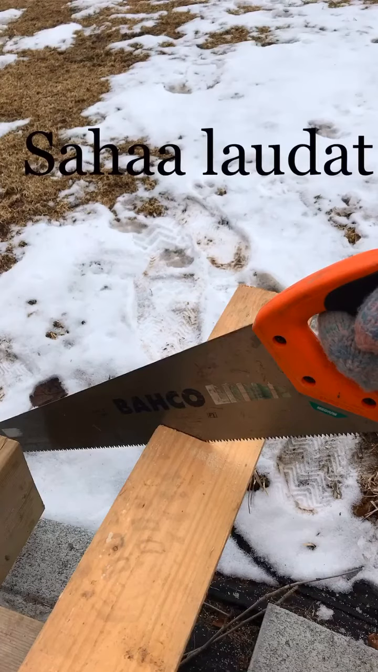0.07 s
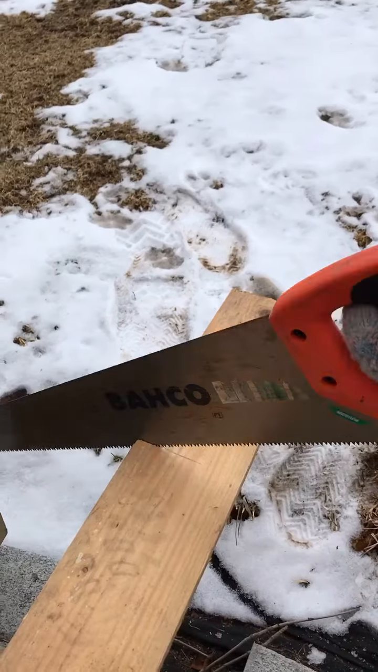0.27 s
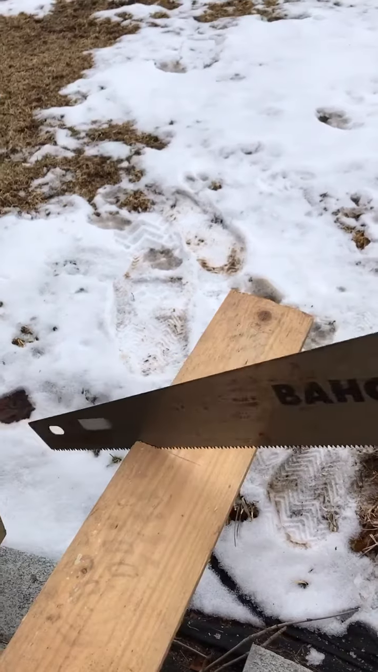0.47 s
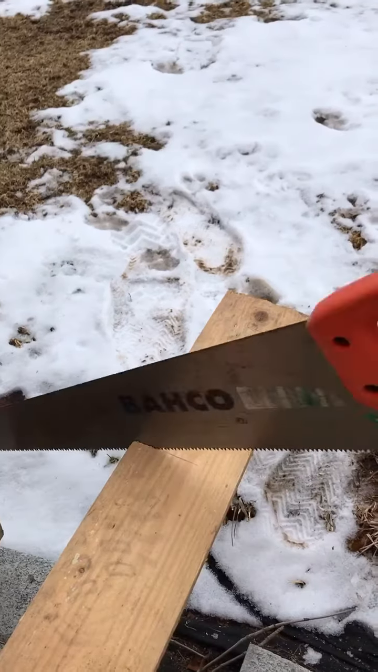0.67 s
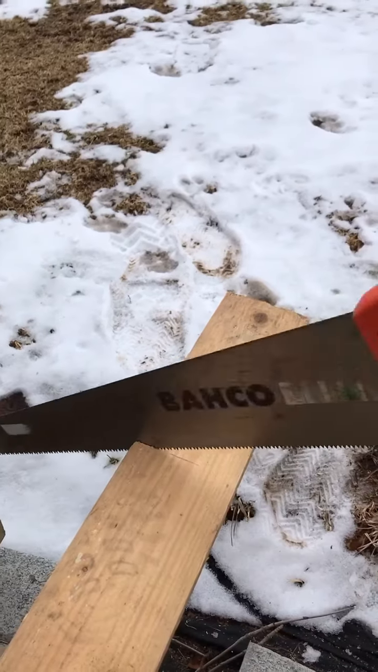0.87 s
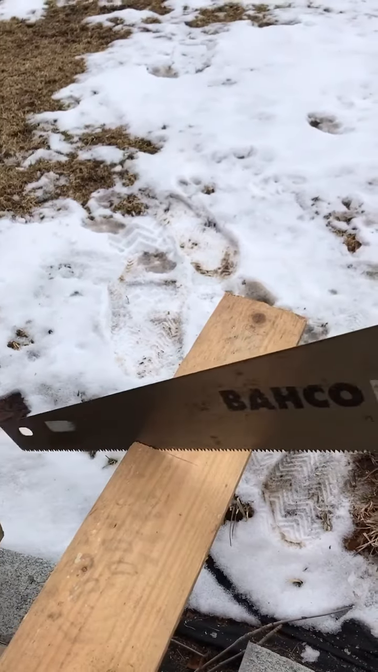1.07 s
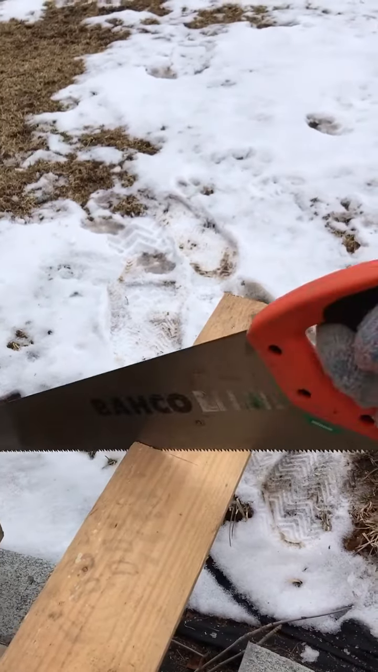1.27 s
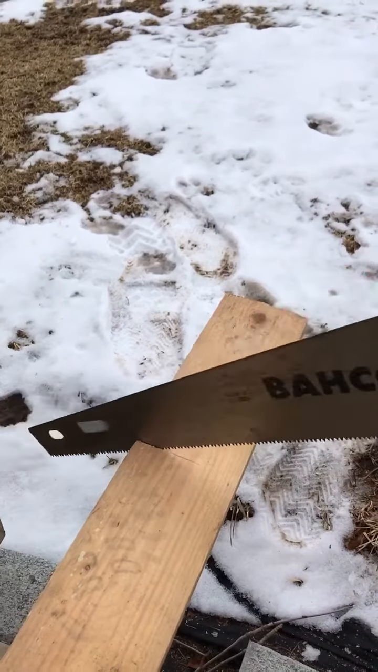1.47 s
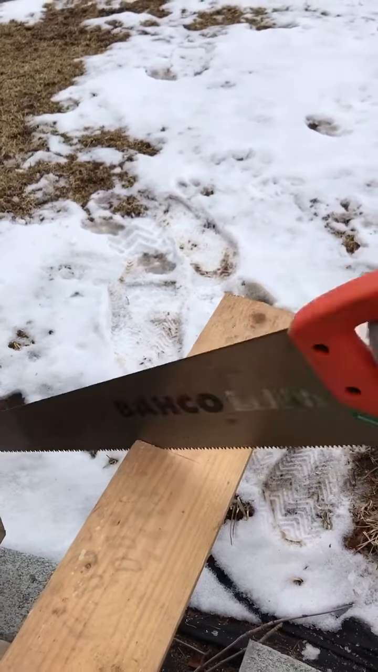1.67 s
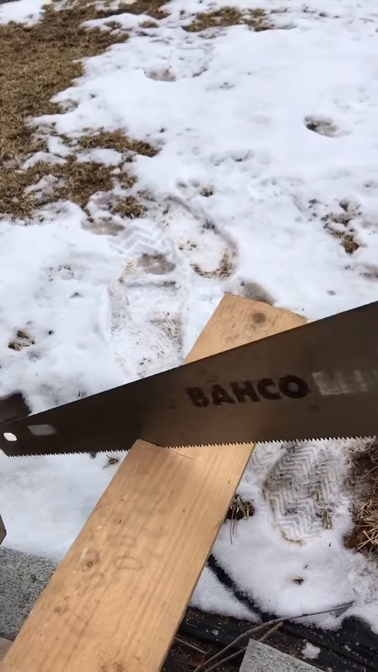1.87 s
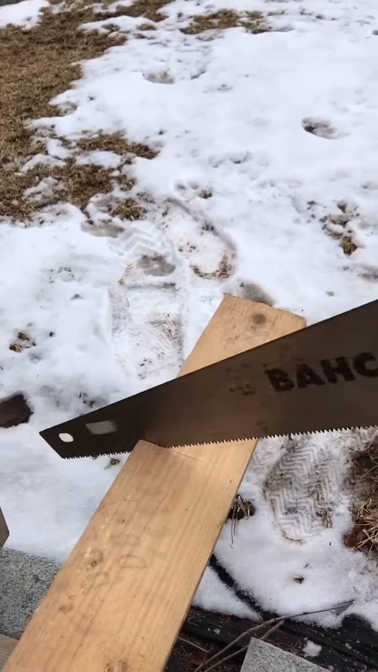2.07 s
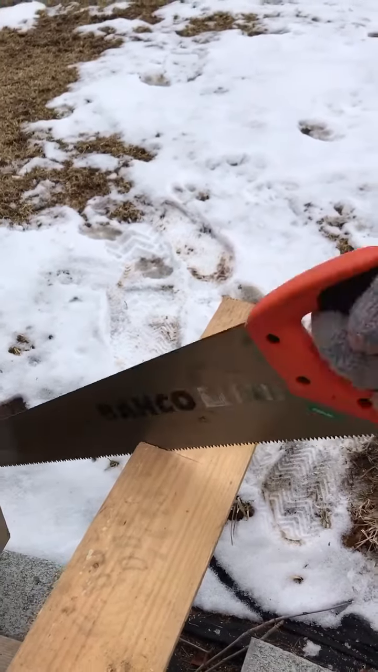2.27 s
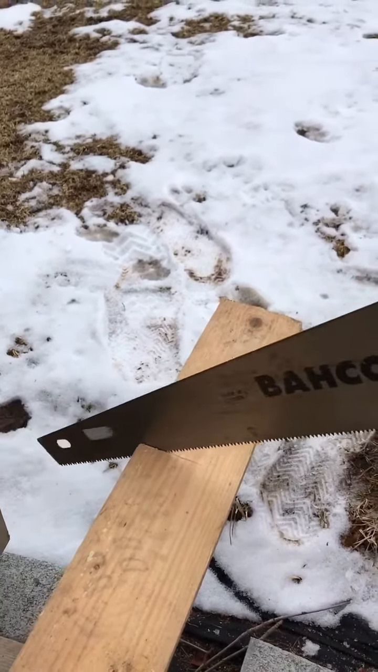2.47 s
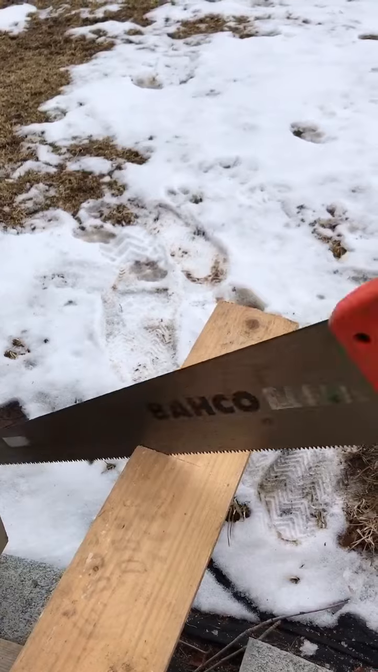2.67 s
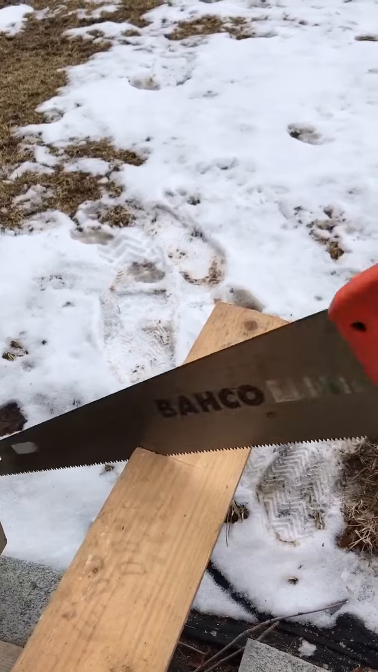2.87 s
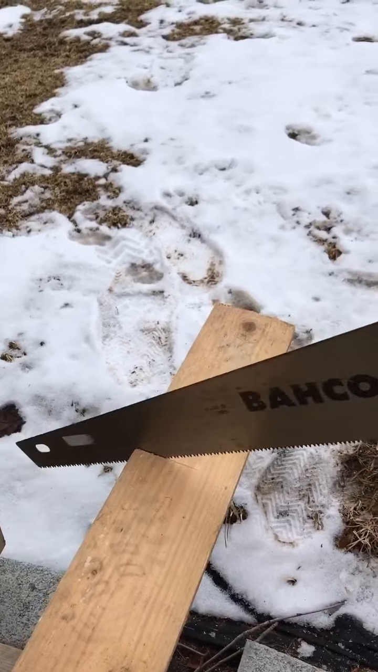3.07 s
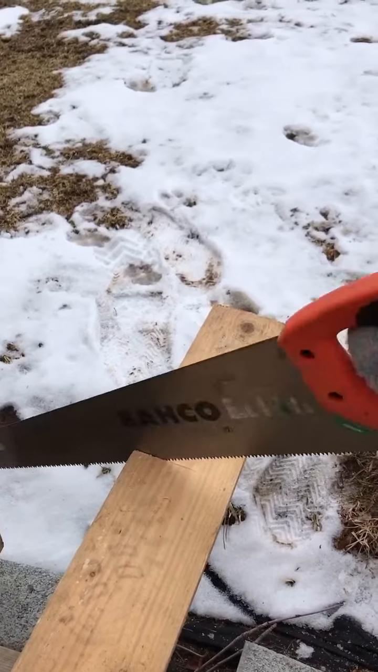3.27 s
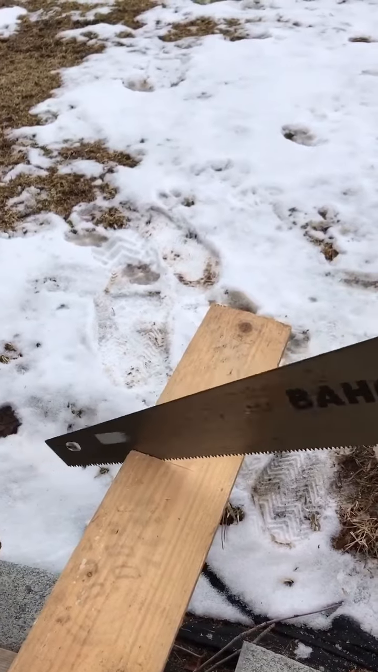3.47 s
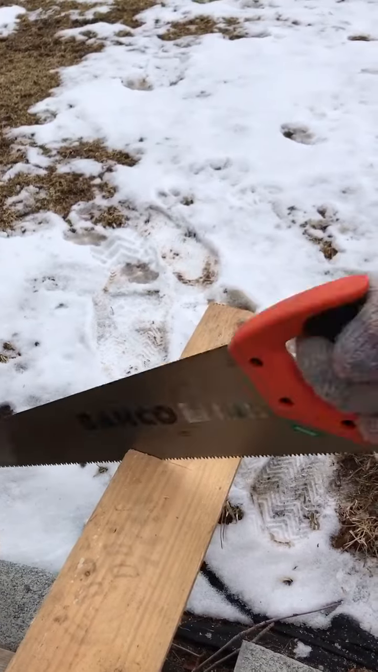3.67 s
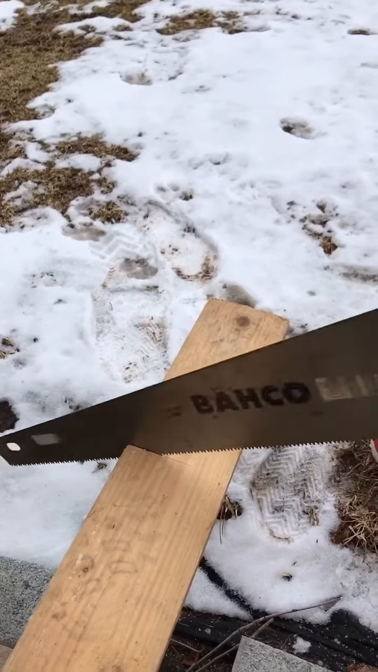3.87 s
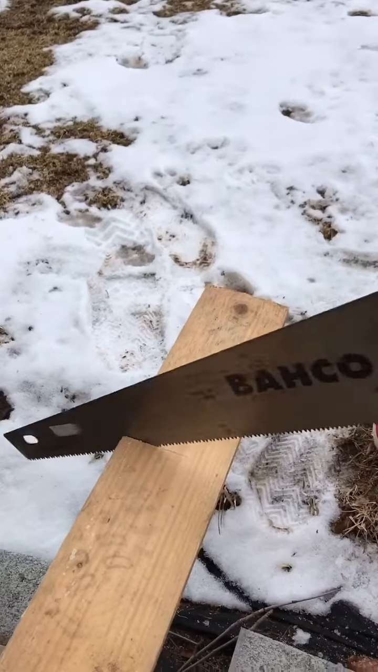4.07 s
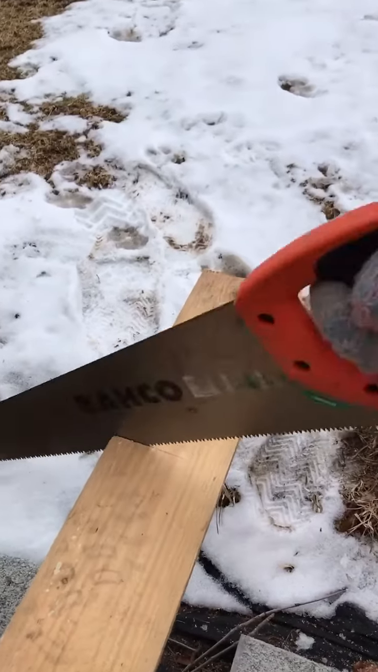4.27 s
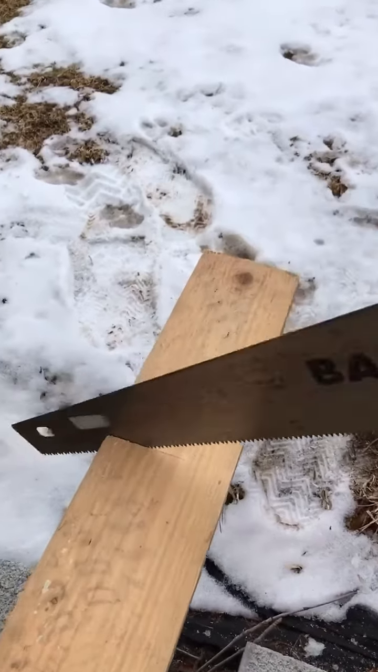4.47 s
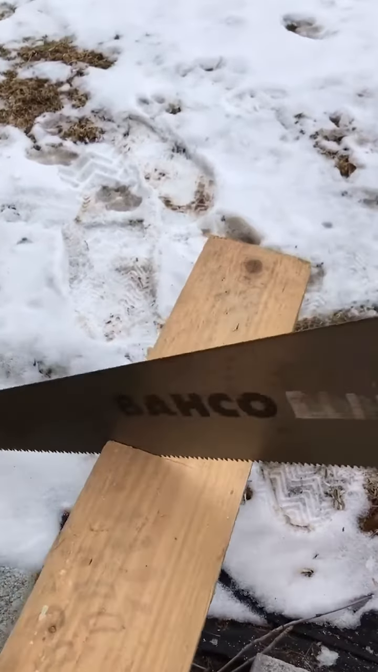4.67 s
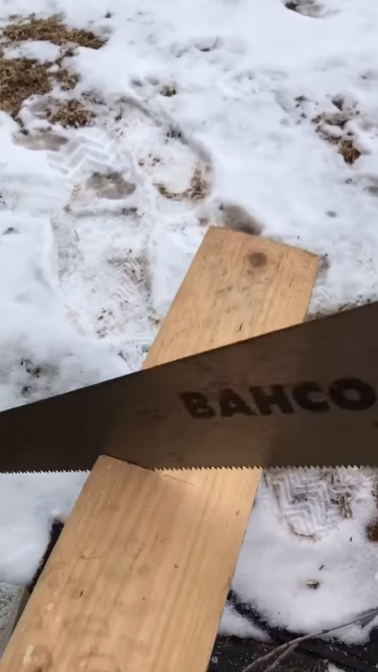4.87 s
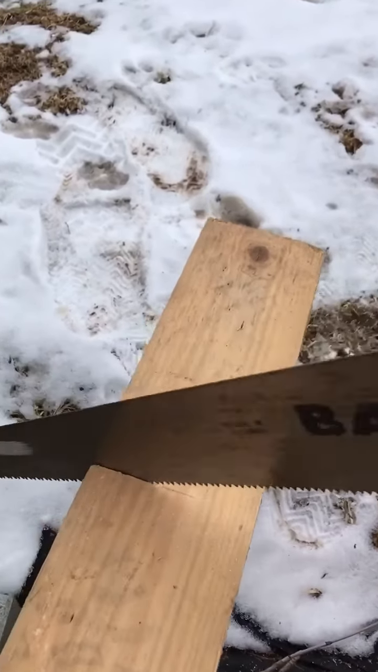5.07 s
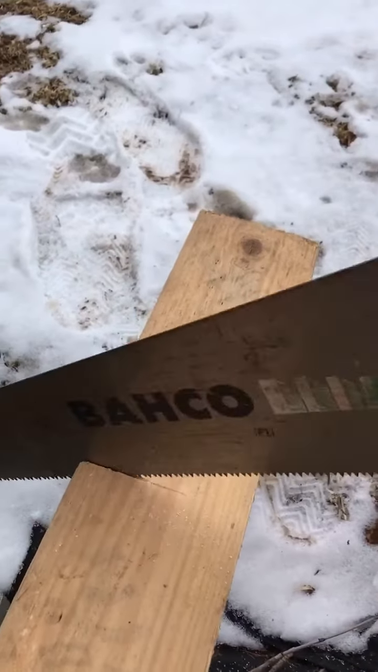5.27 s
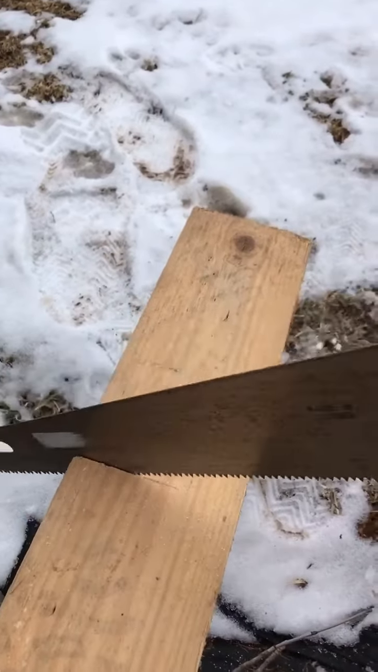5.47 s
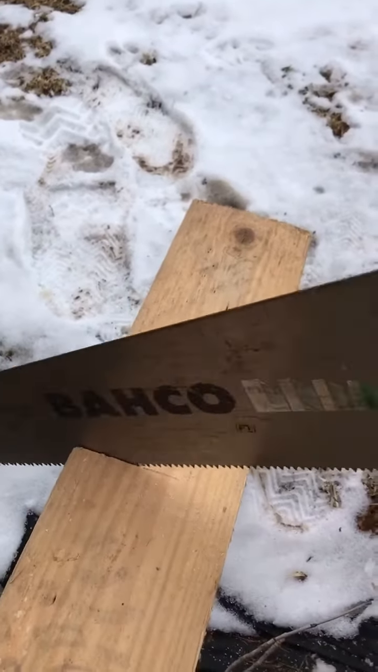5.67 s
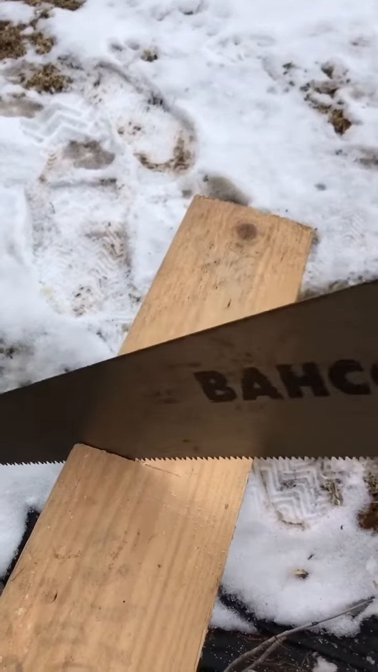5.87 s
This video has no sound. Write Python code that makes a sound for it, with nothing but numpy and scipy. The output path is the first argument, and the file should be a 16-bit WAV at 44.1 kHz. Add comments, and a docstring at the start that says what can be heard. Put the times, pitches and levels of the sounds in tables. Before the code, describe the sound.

After a quarter second of silence, a hand saw is heard close up, cutting a wooden board outdoors over a faint, steady low rush of air. It opens with a light pull, the blade chattering in the cut, and a heavier push follows at about 0.5 seconds. The sawing continues evenly, two pushes and two pulls a second, each stroke gathering speed and then stopping. Pushes are louder, with a tearing wooden rasp, a bright steel hiss and a slight gliding buzz from the teeth; the board thrums and hums briefly as it springs back. Pulls are softer and scraping. Splinters snap with small cracks and knocks throughout, for instance near 0.3, 1.5, 4.5 and 5.5 seconds. After about 4.2 seconds the board's ring shifts as the cut deepens, and the strokes keep their pace until about 6 seconds.

```python
"""A hand saw cutting a board outdoors, heard from one microphone close to the cut.
After a quarter second of silence, faint air opens on a light pull, the blade chattering in the kerf.
A heavier push follows: the teeth tear fibres that ring the board and hiss in the steel, then let go,
and the board springs back. So it goes on, two pushes and two pulls a second, each speeding up and
slowing to rest, with splinters snapping. After 4.2 s the cut is deeper and the board's ring shifts."""
import sys
import numpy as np
from scipy import signal
from scipy.fft import rfft, irfft
from scipy.io import wavfile
from scipy.ndimage import map_coordinates

SR = 44100
rng = np.random.default_rng(int(sys.argv[2]) if len(sys.argv) > 2 else 0)


def wav_out(sig):
    """Save sig, one row per channel (or a flat mono array), as 16-bit PCM at SR to the path in sys.argv[1]."""
    wavfile.write(sys.argv[1], SR, np.round(np.clip(np.atleast_2d(sig).T, -1, 1) * 32767).astype(np.int16))


N = 261051
FFT_SIZE = 2 ** 15
HZ = np.fft.rfftfreq(FFT_SIZE, 1 / SR)


def amp(db):
    """Decibels to gain."""
    return 10 ** (np.asarray(db) / 20)


def unit(x):
    """Scale to rms 1."""
    return x / np.sqrt(np.mean(np.abs(x) ** 2) + 1e-20)


def wobble(n, rate):
    """A smooth random curve of n samples, rate knots a second."""
    knots = rng.standard_normal(int(n * rate / SR) + 4)
    return map_coordinates(knots, [np.arange(n) * rate / SR])


def colour(points):
    """Causal response of power 1 through (frequency [Hz], level [dB]) points."""
    hz, db = np.transpose(points)
    gain = amp(np.interp(np.log(HZ + 1), np.log(hz), db))
    cepstrum = irfft(np.log(gain + 1e-6))
    cepstrum[1:FFT_SIZE // 2] *= 2  # fold to minimum phase
    cepstrum[FFT_SIZE // 2 + 1:] = 0
    return unit(np.exp(rfft(cepstrum)))


def resonances(modes):
    """Causal response of power 1 from (frequency [Hz], width [Hz], level [dB]) modes."""
    return unit(sum((-1) ** k * amp(db) * 1j * HZ * width / (hz * hz - HZ ** 2 + 1j * HZ * width)
                    for k, (hz, width, db) in enumerate(modes)))


def through(x, response):
    """Play x through a response."""
    return signal.fftconvolve(x, irfft(response)[:FFT_SIZE // 4])


def add(track, start_s, x):
    """Mix x into the track from start_s on."""
    span = track[max(round(start_s * SR), 0):][:len(x)]
    span += x[:len(span)]


def bumps(rate_hz, jitter, sharpness):
    """A train of bumps of mean 1 at an unsteady rate, and its phase."""
    phase = 2 * np.pi * np.cumsum(rate_hz * (1 + jitter * wobble(len(rate_hz), 120))) / SR
    train = np.exp(sharpness * np.cos(phase))
    return train / train.mean(), phase


# Open air around the microphone: (frequency [Hz], spectral level [dB])
AIR_SPECTRUM = [(25, -52), (60, -17), (150, 5), (500, -19), (3000, -17), (15000, -39)]

def outdoor_air():
    """A faint, steady, low rush far behind the saw."""
    return amp(-50.5) * through(rng.standard_normal(N), colour(AIR_SPECTRUM))[:N]


def rocking(swing, level_db):
    """Each swing of the arm rocks the board on its support with a dull rumble."""
    support = resonances([(56.6, 15.4, -3.5), (74.5, 16, -6)]) / (1 + 1j * HZ / 120)
    low_cut = (1j * HZ / (1j * HZ + 35)) ** 3
    shove = unit(swing ** 0.48 * rng.standard_normal(len(swing)))
    return amp(level_db - 1) * through(shove, unit(support * low_cut))


def spring_back(level_db, mode_hz=234.6, t60_s=0.11, rise_s=.006):
    """At the end of a push the board springs back and hums briefly in its main mode."""
    t = np.arange(SR // 4) / SR
    swell = 1 - np.exp(-t / rise_s)
    return swell * amp(level_db - 60 * t / t60_s) * np.sin(2 * np.pi * mode_hz * t)


# The board flexing: (frequency [Hz], width [Hz], push level [dB], pull level [dB])
BENDING_MODES = [(124.5, 6.2, -2, -4), (145, 13, -9.5, -1.5), (225.4, 28.7, 2.5, 1), (286, 28, -1, -7.5),
                 (336, 80, -3, -8.5), (422.6, 34, 0, -9), (495, 72, -14.5, -11)]

def bending(push):
    """The board's low modes, driven differently on the push and the pull."""
    return resonances([(hz, width, push_db if push else pull_db)
                       for hz, width, push_db, pull_db in BENDING_MODES])


# Ring of board and kerf, shallow and deep cut: (frequency [Hz], width [Hz], level [dB])
SHALLOW_PUSH_MODES = [(723, 75, -6), (1114, 96, 1.5), (1527, 77, -2.5), (1977, 170, -5), (2445, 84, -9.5),
                      (2885, 240, -13), (3320, 68, -12.5)]
SHALLOW_PULL_MODES = [(771, 42, 3), (1112, 113, 4.5), (1588, 96, 1.5), (2073, 107, 0.5), (2470, 80, -5),
                      (3250, 370, -5.5)]
DEEP_PUSH_MODES = [(620, 130, -14.5), (823, 44, 1.5), (977, 95, -1.5), (1137, 74, 1), (1400, 55, -10.5),
                   (1630, 64, -1), (1890, 390, -10), (2376, 66, -5.5), (2580, 57, -13), (3230, 260, -16)]
DEEP_PULL_MODES = [(807, 60, 4.5), (1110, 110, 3), (1740, 150, 1), (2372, 35, 3.5), (2670, 75, -2.5),
                   (3310, 250, -15)]

def kerf_ring(push, deep):
    """The blade seats a little differently on each stroke, which moves every resonance of the kerf."""
    if deep:
        modes = DEEP_PUSH_MODES if push else DEEP_PULL_MODES
    else:
        modes = SHALLOW_PUSH_MODES if push else SHALLOW_PULL_MODES
    shifts = rng.standard_normal((len(modes), 2))
    return resonances([(hz * (1 + 0.012 * detune), width, db + shift_db)
                       for (hz, width, db), (detune, shift_db) in zip(modes, shifts)])


# Splinters snapping near the microphone: (time [s], crack level [dB], knock level [dB])
SPLINTERS = [(0.2946, -21, -49), (.317, -27, -26), (0.3537, -29, -15), (.823, -17, -37),
             (1.034, -35, -19.5), (1.055, -33, -20), (1.522, -27, -24), (1.562, -29, -12),
             (1.776, -26, -32), (2.4002, -25, -31), (2.464, -35, -18.5), (2.961, -33, -20),
             (3.0103, -40, -24), (3.057, -40, -19), (3.823, -32, -14.5), (3.942, -35, -19),
             (4.445, -23, -17.5), (4.515, -25, -17.5), (5.321, -29, -30), (5.395, -20, -18.5),
             (5.533, -32, -10), (5.8687, -18, -15), (5.891, -25, -12.5)]

def splinters(t60_s=0.012):
    """A tooth snags: the splinter breaks with a short bright crack and knocks the board."""
    track, t = np.zeros(N), np.arange(SR // 20) / SR
    crack = colour([(300, -12), (1500, -10), (5000, -9.5), (11000, -6.0), (16000, -11)])
    knock = unit(resonances(SHALLOW_PUSH_MODES) + bending(push=True))
    for start_s, crack_db, knock_db in SPLINTERS:
        burst = rng.standard_normal(len(t)) * amp(-60 * t / t60_s)
        add(track, start_s, through(burst, amp(crack_db - 1.5) * crack + amp(knock_db) * knock))
    return track


def tooth_tone(t, phase, speed, firmest_s, level_db):
    """Evenly spaced teeth sing a tone that glides with the speed and swells while the blade runs true."""
    true_run = 0.42 + np.exp(-((t - firmest_s) / 0.034) ** 2)
    gain = signal.windows.tukey(len(t), .15) * amp(level_db + 3.5 + 1.7 * wobble(len(t), 61))
    force = true_run * np.sqrt(speed) * gain
    board_mode = 1j * HZ * 26 / (230 ** 2 - HZ ** 2 + 1j * HZ * 18)  # rings as the tone glides past
    return through(force * np.sin(phase), 0.53 + board_mode)


def fibres(grip, per_second, spread_db):
    """Fibres snap at random, more often where the teeth grip; rms 1."""
    n = len(grip)
    snaps = rng.random(n) < per_second * grip / SR
    return unit(snaps * rng.choice([-1, 1], n) * amp(spread_db * rng.standard_normal(n)))


def bites(phase, sharpness=27.7, spread_db=3.0):
    """One short tug for each tooth, no two equally strong; rms 1."""
    tooth = np.round(phase / (2 * np.pi)).astype(int)
    sizes = amp(spread_db * rng.standard_normal(tooth.max() + 1))
    return unit(np.gradient(sizes[tooth] * np.exp(sharpness * (np.cos(phase) - 1))))


def board_thrum(load, teeth, flaps, chatter, level_db, push):
    """The board bends under the teeth, and the flapping blade shakes it at its own rate."""
    tugs = load * fibres(teeth, per_second=1200, spread_db=0.5)
    thrum = amp(level_db - 0.5) * through(tugs, bending(push))
    shaking = amp(level_db - (2.5 if push else 15)) * chatter * load * unit(flaps - 1)
    return thrum + through(shaking, 1 / (1 + 1j * HZ / 170) ** 2)


# Hiss of the tooth tips at close range: (frequency [Hz], spectral level [dB])
PUSH_HISS = [(500, -21), (1200, -14.5), (2200, 3.5), (3200, 2.5), (4400, 0), (4950, -2.5), (5400, -2.5),
             (6900, -4.5), (7600, -7.5), (9000, -6), (10400, -9), (12000, -5), (15800, -7.5)]
PULL_HISS = [(500, -34), (1200, 1), (2200, -1.5), (3200, -3.5), (4400, -5), (4950, -8.5), (5400, -4.5),
             (6900, -7.5), (7600, -11.5), (9000, -9), (10400, -12), (12000, -8.5), (15800, -10.5)]
DEEP_HISS = [(500, -22.5), (1200, -5), (2200, -2), (3200, -2), (4400, -4), (4950, -6), (5400, -6),
             (6900, -6), (7600, -11.5), (9000, -7.5), (10400, -11), (12000, -6), (15800, -8)]

def blade_hiss(grip, gain, push, deep, t60_s=0.051):
    """The tooth tips scrape fine grains, which the blade radiates as hiss."""
    spectrum = DEEP_HISS if deep else PUSH_HISS if push else PULL_HISS
    scraping = fibres(grip, per_second=15000, spread_db=2)
    # Direct sound plus the steel's crowded modes, new on each stroke.
    t = np.arange(FFT_SIZE) / SR
    tail = unit(rfft(rng.standard_normal(FFT_SIZE) * amp(-60 * t / t60_s)))
    blade = unit(1 + amp(-6.5) * tail)
    return through(scraping * gain, colour(spectrum) * blade) * amp(4.3 if push else 3.5)


# The steel blade, ringing on through the turns: (frequency [Hz], width [Hz], level [dB])
STEEL_MODES = [(1172, 14.8, 2.5), (1303, 14, -1.5), (1590, 23, -4.5), (2310, 25, -2.5), (2644, 43, -9)]

def tearing_wood(grip, phase, gain, kerf, push):
    """Tearing fibres and the tugs of the teeth ring the board, the kerf and the steel."""
    tearing = fibres(grip, per_second=8000, spread_db=2.5) + amp(-13 if push else -21) * bites(phase)
    ring = kerf + amp(-10) * resonances(STEEL_MODES)
    return through(tearing * gain, ring) * amp(-2 if push else -1.6)


def arm_effort(progress, wood_db, hiss_db, lean_db, push):
    """The arm's swing and growing weight set the gains of wood and hiss and the load on the board."""
    swing = np.sin(np.pi * (.04 + .94 * progress))
    wood_power, hiss_power = (1.67, 1.88) if push else (0.96, 1.29)  # tooth backs drag more evenly
    dulling_db = 0 if push else 6  # along a pull the hiss falls behind the wood
    wood_gain = swing ** wood_power * amp(wood_db + lean_db * (progress - .5))
    hiss_gain = swing ** hiss_power * amp(hiss_db + (lean_db - dulling_db) * (progress - .5))
    # The board bends even under a slow blade; on a push, most while the teeth dig in.
    load = unit(wood_gain ** 0.72 * amp(-9.5 * progress) if push else wood_gain ** 0.37)
    return swing, wood_gain, hiss_gain, load


def stroke(start_s, end_s, wood_db, hiss_db, lean_db, rock_db, chatter,
           tooth_hz, thrum_db, tone_db, firmest_s, push):
    """One pass of the blade: it gathers speed slowly and stops fast, the teeth biting in step."""
    t = np.arange(start_s, end_s, 1 / SR)
    progress = np.linspace(0, 1, len(t))
    speed = np.sin(np.pi * (.04 + .92 * progress ** 1.45)) ** .9  # share of the top speed
    swing, wood_gain, hiss_gain, load = arm_effort(progress, wood_db, hiss_db, lean_db, push)
    deep = start_s > 4.2
    kerf = kerf_ring(push, deep)
    teeth, phase = bumps(tooth_hz * speed, jitter=.03, sharpness=.45)
    # Chatter: the blade flaps sideways at its own rate.
    flap_hz, jitter, sharpness = (116., .05, .75) if push else (76., .28, 1.2)
    flaps, _ = bumps(np.full(len(t), flap_hz), jitter, sharpness)
    # The grip is most uneven while the stroke gets under way.
    uneven = amp(np.linspace(3.2, .6, len(t)) * wobble(len(t), 90))
    grip = teeth * (1 - chatter + chatter * flaps) * uneven
    return (tearing_wood(grip, phase, wood_gain, kerf, push)
            + blade_hiss(grip, hiss_gain, push, deep)
            + board_thrum(load, teeth, flaps, chatter, thrum_db, push)
            + tooth_tone(t, phase, speed, firmest_s, tone_db)
            + rocking(swing, rock_db))


# Cutting strokes, close to the microphone: (start [s], end [s], wood [dB], hiss [dB],
# pressure rise [dB], rocking [dB], chatter [0-1], top tooth rate [Hz], thrum [dB], tooth tone [dB],
# time of firmest tone [s], spring-back [dB])
PUSH_STROKES = [(.485, 0.747, -22.5, -31, 13.5, -42, 0.37, 421.2, -29.5, -33.5, .6, -24),
                (0.999, 1.251, -22, -32, 5.5, -56, 0.22, 432, -28, -32, 1.1, -23),
                (1.49, 1.734, -21.5, -30.5, 12, -41, 0.5, 445.6, -27, -32, 1.6, -20),
                (2.007, 2.266, -22, -31, 20.5, -45, .75, 410, -29, -24.5, 2.18, -27),
                (2.509, 2.76, -22.5, -31.5, 6.5, -43, 0.54, 406.8, -27.5, -26.5, 2.71, -30),
                (3.021, 3.221, -22.5, -30.5, 8, -46, 0.27, 404, -29, -26.5, 3.15, -19.5),
                (3.481, 3.733, -21, -29, 3, -50, 0.15, 446, -30, -25.5, 3.64, -22),
                (3.972, 4.231, -22.5, -30.5, 12, -42, 0.01, 413.6, -30, -23, 4.15, -35),
                (4.472, 4.753, -22.5, -30, 6.5, -45, 0.06, 388.1, -26.5, -28.5, 4.65, -31),
                (4.996, 5.224, -19.5, -28, 10, -49, 0.1, 383.8, -29.5, -29.5, 5.08, -28),
                (5.464, 5.708, -21, -28, 11.5, -50, 0, 378, -31.5, -24.5, 5.63, -34)]
# Return strokes: (start [s], end [s], wood [dB], hiss [dB], pressure rise [dB], rocking [dB],
# chatter [0-1], thrum [dB])
PULL_STROKES = [(0.252, 0.481, -31, -33.5, 20.5, -52, 0.66, -36.5),
                (.748, 0.999, -32, -33, 17, -39.5, 0.14, -37),
                (1.249, 1.49, -30, -32.5, 18.5, -55, 0.72, -36.5),
                (1.735, 2.005, -30.5, -33, 10.5, -45.5, 0.53, -38),
                (2.263, 2.508, -33, -32.5, 20, -48, .5, -41),
                (2.786, 3.026, -33, -36, 11.5, -41.5, 0.73, -37.5),
                (3.254, 3.481, -30.5, -34, 15.5, -47.5, 0.85, -36),
                (3.729, 3.974, -28.5, -30, 19, -43, 0.8, -37),
                (4.232, 4.474, -28, -31.5, 19, -44, 0.5, -33.5),
                (4.754, 4.998, -29.5, -31, 13.5, -42.5, 0.25, -39),
                (5.221, 5.463, -29, -30, 15, -47.5, 0.53, -37.5),
                (5.707, 5.979, -30, -31, 28.5, -47.5, 0.45, -41.5)]

def sawing():
    """Heavy pushes and lighter pulls in turn; the teeth let go just before each push ends."""
    track = np.zeros(N)
    for start_s, end_s, *settings, spring_db in PUSH_STROKES:
        add(track, start_s, stroke(start_s, end_s, *settings, push=True))
        add(track, end_s - .025, spring_back(spring_db))
    for start_s, end_s, *settings, thrum_db in PULL_STROKES:
        firmest_s = start_s + .75 * (end_s - start_s)
        pull = stroke(start_s, end_s, *settings, tooth_hz=325.2, thrum_db=thrum_db,
                      tone_db=-45, firmest_s=firmest_s, push=False)
        add(track, start_s, pull)
    return track


def scene():
    """Faint outdoor air behind, the saw and its splinters close in front, in mono."""
    return (outdoor_air() + sawing() + splinters())[None]


def record(dry, open_s=0.266, fade_s=0.013, top_hz=15850):
    """The microphone fades in after a short silence; a steep low-pass cuts the highest treble."""
    fade_in = np.clip((np.arange(N) / SR - open_s) / fade_s, 0, 1)
    low_pass = signal.firwin(601, top_hz, fs=SR, window="blackman")
    return signal.fftconvolve(dry * fade_in, low_pass[None], mode="same", axes=1)


dry = scene()
out = record(dry)
wav_out(out)
```